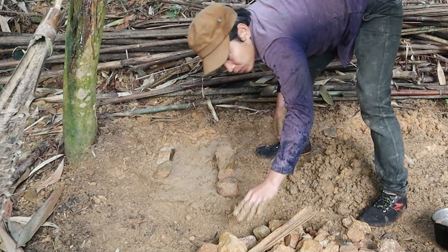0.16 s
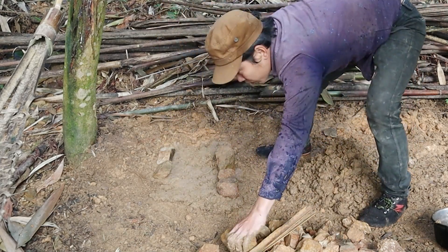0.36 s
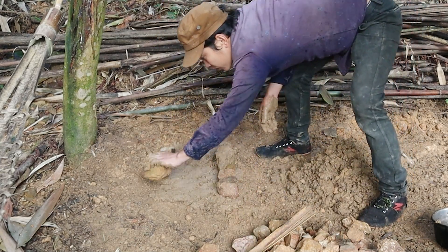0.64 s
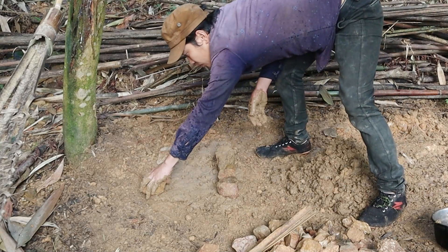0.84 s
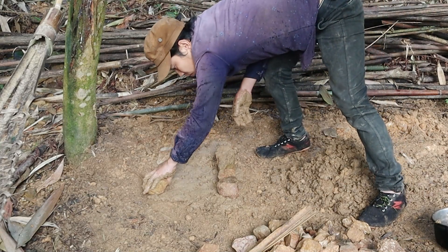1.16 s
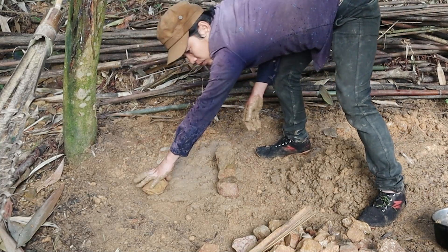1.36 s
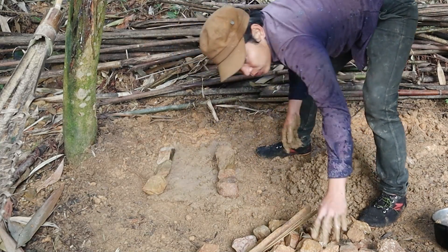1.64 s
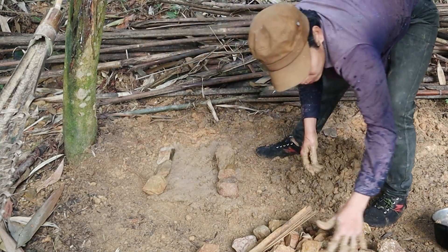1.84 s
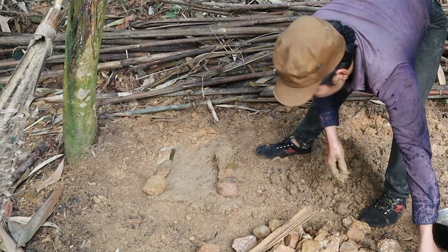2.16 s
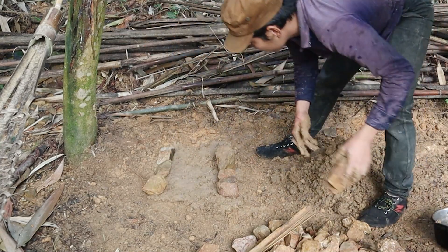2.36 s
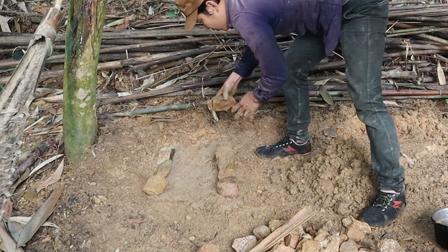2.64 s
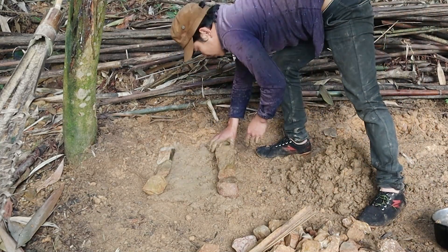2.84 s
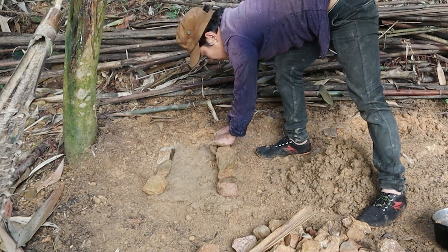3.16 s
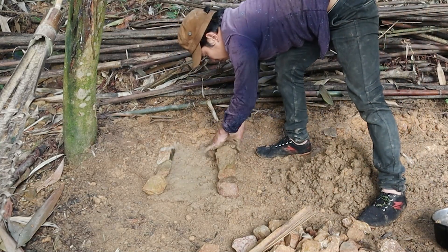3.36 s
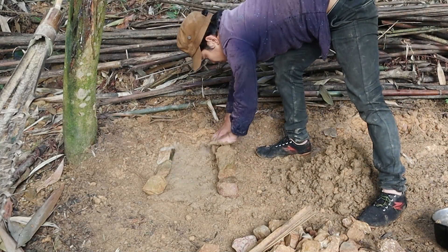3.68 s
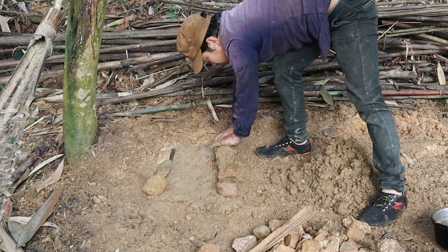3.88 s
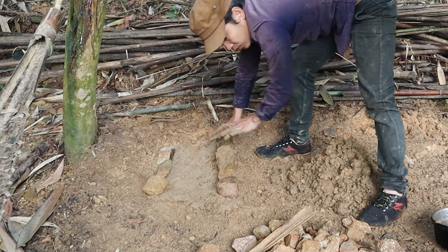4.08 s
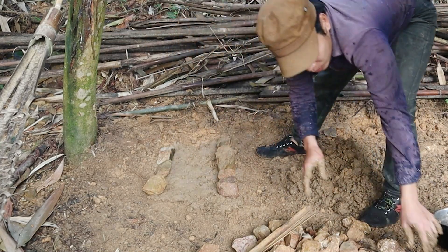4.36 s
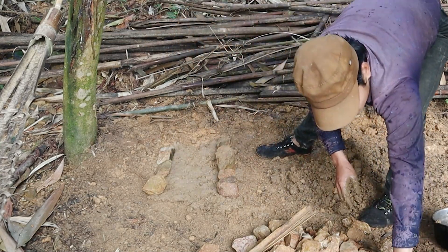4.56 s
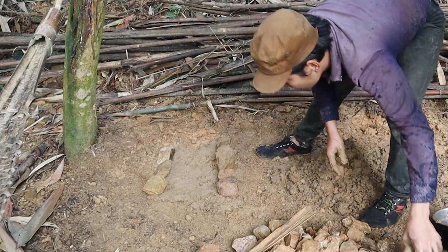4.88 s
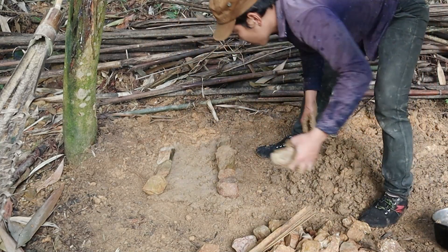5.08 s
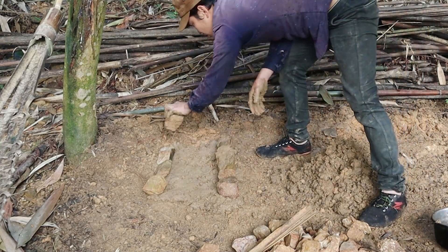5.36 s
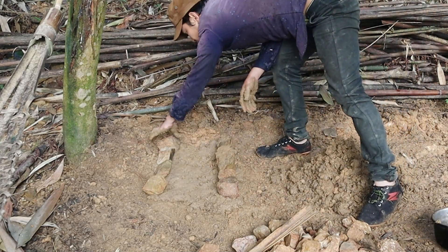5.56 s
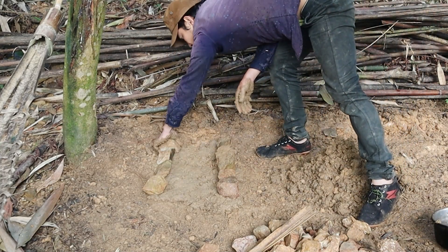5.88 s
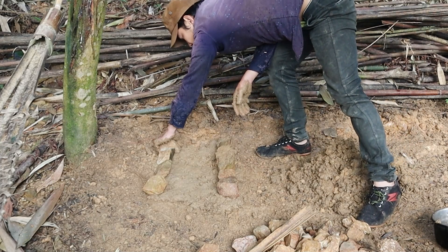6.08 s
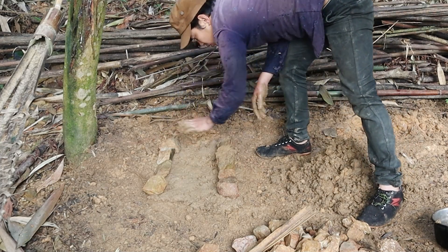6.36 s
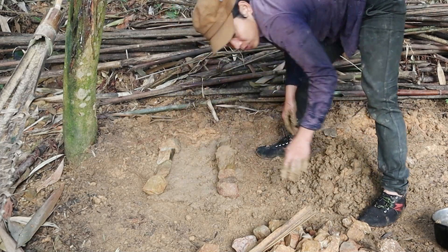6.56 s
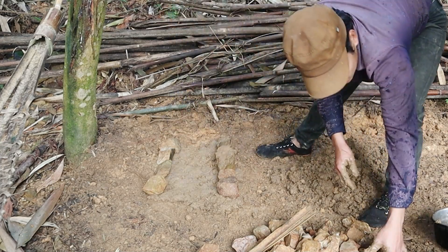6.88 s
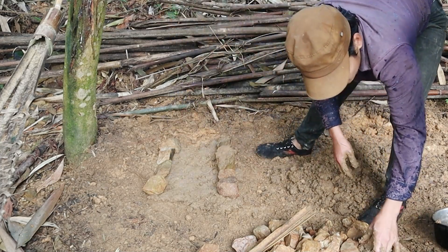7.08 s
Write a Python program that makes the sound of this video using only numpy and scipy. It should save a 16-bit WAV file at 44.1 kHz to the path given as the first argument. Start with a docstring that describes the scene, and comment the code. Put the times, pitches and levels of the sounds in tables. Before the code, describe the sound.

At the edge of a wood, someone sets stones into dry soil close to the microphone. One lands with a sharp, gritty clack, three more follow near the middle, and two land later with dull thuds. In between, stones tap together and hands briefly scrape loose earth. High insects drone throughout over a soft hush, with a few faint bird chirps and a thin distant hum.

```python
"""At the edge of a wood, someone picks stones from a heap and beds them in dry soil, close to one microphone.
Each stone clacks, crushes grit and thumps the ground, then rocks once. In between, stones tap together
and hands scrape through loose earth; the woodpile and trees scatter these sounds into a short tail.
Insects drone high in the trees, with a few faint bird chirps and a thin hum farther off."""
import sys
import numpy as np
from scipy import signal
from scipy.fft import rfft, irfft, next_fast_len
from scipy.io import wavfile

SR = 44100
rng = np.random.default_rng(int(sys.argv[2]) if len(sys.argv) > 2 else 0)


def generate_wav(sig):
    """Save sig (samples, or channels by samples) to the path in sys.argv[1] as 16-bit PCM at SR."""
    pcm = np.round(np.clip(np.atleast_2d(sig).T, -1, 1) * 32767).astype(np.int16)
    wavfile.write(sys.argv[1], SR, pcm)


N = 318402

# Stones set down by the microphone. Each row: time in seconds, clack peak in dB, pitch in Hz, overtone
# peak in dB, its pitch in Hz, seconds until the grit gives way, grit level in dB, thud level in dB,
# rocking in dB relative to the landing.
PLACINGS = [(0.7545, -1, 1145, -11.5, 3430, 0.00089, -13.5, -15, -10.5),
            (2.9074, -3.5, 1400, -15, 4020, .0005, -5.5, -22, -24),
            (3.3358, -8.5, 1000, -12.5, 2780, .001, -26, -33, -19),
            (3.7123, -6.5, 866, -10.5, 1640, .016, -17, -21.5, -7.5),
            (5.5193, -14, 1170, -7, 2380, .0003, -3.5, -2.5, -35),
            (5.9344, -22.5, 655, -11, 5400, .0003, -19, -17.5, -14.5)]
# The spectrum of breaking grit. Each row: frequency in Hz, relative level in dB.
GRIT = [(40, -39), (150, -9), (400, 0), (1000, 0), (1600, -1.5), (3500, 1), (6000, 1.5), (9000, 1),
        (11000, -8.5), (15000, 9.5)]
ROCK_S = .0095  # from landing to rocking
LEAD_S = .01  # room before each blow for its first tiny contacts


def from_db(db):
    """Decibels to gain."""
    return 10 ** (np.asarray(db) / 20)


def rms_one(x):
    """Scale to unit power."""
    return x / np.sqrt(np.mean(x ** 2) + 1e-20)


def add(out, s, sound):
    """Mix a sound in, starting at s seconds."""
    start = round(s * SR)
    first, last = max(start, 0), min(start + len(sound), N)
    if last > first:
        out[first:last] += sound[first - start:last - start]


def coloured(x, spectrum, shape=lambda hz: 1):
    """Filter x by a spectrum, times an extra gain by frequency; rms 1."""
    size = next_fast_len(len(x))
    hz = np.maximum(np.arange(size // 2 + 1) * SR / size, 1)
    points_hz, points_db = np.transpose(spectrum)
    gain = from_db(np.interp(np.log(hz), np.log(points_hz), points_db)) * shape(hz)
    return rms_one(irfft(rfft(x, size) * gain, size)[:len(x)])


def drift(per_s):
    """Glide between random values, per_s of them a second; rms 1."""
    position = np.arange(N) / SR * per_s
    return rms_one(np.interp(position, np.arange(N), rng.standard_normal(N)))


def grains(size, per_s, spread_db):
    """Crumbs snapping at random, as clicks of uneven strength."""
    snaps = rng.random(size) < per_s / SR
    return snaps * rng.choice([-1, 1], size) * from_db(spread_db * np.minimum(rng.exponential(1, size), 4))


def damped_ring(hz, q):
    """A struck body's ring, which swells and dies within a few cycles; peak 1."""
    w = 2 * np.pi * min(hz, SR / 2 - 2000) / SR
    damping = np.sin(w) / (2 * max(q, .3))
    b, a = [damping, 0, -damping], [1 + damping, -2 * np.cos(w), 1 - damping]
    ring = signal.lfilter(b, a, signal.lfilter(b, a, signal.unit_impulse(SR // 10)))
    return ring / np.abs(ring).max()


def insects(chorus_db=-39, singers_db=-43, throb=0.87, waver_hz=13, swell_db=2.0):
    """Up in the trees, a blurred far chorus and a few near singers that throb with each wing stroke."""
    # The far chorus. Each row: frequency in Hz, relative level in dB.
    chorus_spectrum = [(9000, -37), (10300, -21.5), (10750, -6), (11150, -1.5), (11900, -0.5),
                       (12080, -0.5), (12620, -0.5), (12780, -36), (13300, -44)]
    # The nearest insects. Each row: pitch in Hz, dB relative to singers_db, wing strokes a second.
    singers = [(11180, -9, 37), (12340, -6.5, 32), (12250, -2, 46), (12240, -2, 100)]
    t = np.arange(N) / SR
    resting = np.clip(np.minimum(t - .78, 1.32 - t) / .05, 0, 1)
    near_db = singers_db - 9 * resting  # the near singers ease off once
    chorus_gain = from_db(chorus_db + 0.3 * resting + 0.63 * drift(9))
    out = chorus_gain * coloured(rng.standard_normal(N), chorus_spectrum)
    for hz, db, strokes in singers:
        wing = np.sin(2 * np.pi * np.cumsum(strokes + 0.49 * drift(4.8)) / SR)
        tone = np.sin(2 * np.pi * np.cumsum(hz + waver_hz * drift(70)) / SR)
        out += from_db(near_db + db + swell_db * drift(16)) * rms_one(tone * (1 + throb * wing))
    return out


def far_hum(blur_hz=22):
    """One thin, wavering tone a long way off."""
    # The hum's course. Each row: time in seconds, pitch in Hz, rms level in dB.
    course = [(0, 920, -64), (1.2, 910, -67.5), (2.2, 865, -65.5), (3.5, 885, -70), (4.6, 870, -62),
              (5.4, 845, -66.5), (7.2, 850, -64)]
    s, hz, db = np.transpose(course)
    t = np.arange(N) / SR
    pitch_hz = np.interp(t, s, hz) + blur_hz * drift(90)
    tone = np.sin(2 * np.pi * np.cumsum(pitch_hz) / SR)
    return from_db(np.interp(t, s, db)) * rms_one(tone)


def woods_hush(db=-47):
    """The steady, soft noise of the wood all around."""
    # The hush. Each row: frequency in Hz, relative level in dB.
    spectrum = [(25, -10), (50, -20), (80, -2), (120, -1.5), (280, 0), (500, -2), (1300, -5), (3000, -6.5),
                (5700, -9), (6400, -12), (9500, -12), (13300, -5), (16000, -5.5)]
    return from_db(db) * coloured(rng.standard_normal(N), spectrum)


def birds(note_hz=2930, half_length_s=0.013, blur_hz=170, faint_db=-58.5, spread_octaves=0.33):
    """A far bird repeats one short note, blurred by the trees; fainter birds chirp at random."""
    # The repeated note. Each row: time in seconds, peak level in dB.
    notes = [(0.244, -44.5), (0.615, -51), (2.49, -52), (2.835, -53), (3.365, -37.5)]
    out, t = np.zeros(N), np.arange(N) / SR
    blur_cycles = np.cumsum(blur_hz * drift(500)) / SR
    chirps = [(s, db, note_hz) for s, db in notes]
    for when, pitch in rng.random(size=(10, 2)):
        chirps.append((when * t[-1], faint_db, note_hz * 2 ** (spread_octaves * (2 * pitch - 1))))
    for s, db, hz in chirps:
        span = np.abs(t - s) < 10 * half_length_s
        envelope = from_db(db) / (1 + ((t[span] - s) / half_length_s) ** 4)
        out[span] += envelope * np.sin(2 * np.pi * (hz * t[span] + blur_cycles[span]))
    return out


def clack(db, hz, q, rough_db, rough_s):
    """Rough faces meet LEAD_S in: one ring amid a spray of tiny contacts, weaker when it rings clean."""
    lead = round(LEAD_S * SR)
    t = np.arange(-lead, lead) / SR
    ring = from_db(db) * damped_ring(hz, q)
    contacts = grains(len(t), per_s=7600, spread_db=-0.5) * np.exp(-np.abs(t - rough_s) / rough_s)
    spray = coloured(contacts, GRIT, lambda f: 1 / (1 + (hz / f) ** 2) / np.sqrt(1 + (f / (3 * hz)) ** 2))
    spray_gain = from_db(rough_db) * np.linalg.norm(ring) / np.sqrt(len(t) * q) * hz / (hz + 1800)
    sound = np.pad(ring, (lead, 0))
    sound[:len(t)] += spray_gain * spray
    return sound


def taps(rough_db=-3, rough_s=0.00096, rebound_s=.0036, rebound_db=-3.5):
    """Stone taps stone in the hand or on the heap, and rebounds into a softer second touch."""
    # The taps. Each row: time in seconds, ring peak in dB, pitch in Hz, sharpness as Q.
    touches = [(0.3503, -28, 4500, .6), (0.368, -27.5, 1340, 2), (0.475, -26.5, 2360, 1.8),
               (0.501, -31, 1590, 0.91), (0.7817, -15, 1510, 0.26), (0.799, -15, 8000, 0.65),
               (0.981, -20.5, 9000, 0.31), (1.8967, -27.5, 2800, 1.7), (2.2083, -12, 8100, 1.4),
               (2.902, -9, 3280, 1.1), (3.1745, -21, 5800, 3.2), (3.1905, -11.5, 6150, 2),
               (3.318, -22, 5960, 1.2), (4.6857, -6, 8830, 6.1), (4.697, -5, 13600, 1.6),
               (4.7652, -9.5, 2760, 0.33), (4.836, -22, 4970, 0.34), (4.9092, -23.5, 4700, 3.1),
               (5.7715, -27.5, 5200, 4), (5.931, -12, 5300, 2), (7.0304, -14, 2000, 1.6),
               (7.063, -12.5, 2480, 1.2), (7.0765, -12.5, 2180, 0.58)]
    out = np.zeros(N)
    gaps = rebound_s * (1 + .15 * rng.uniform(-1, 1, len(touches)))
    for (s, db, hz, q), gap in zip(touches, gaps):
        add(out, s - LEAD_S, clack(db, hz, q, rough_db, rough_s))
        add(out, s + gap - LEAD_S, clack(db + rebound_db, hz, q, rough_db, rough_s))
    return out


def scrapes(bass_leak=0.099, fade_over_rise=1.58):
    """Soil and stones slide under the hand; fine dust sounds thinner than coarse crumbs."""
    # Hand strokes. Each row: time of the peak in seconds, rms level there in dB, rise in seconds,
    # frequency in Hz below which it thins, tilt in dB per octave.
    strokes = [(0.366, -37, 0.014, 860, 0.5), (0.799, -32.5, 0.0094, 500, 3.5),
               (1.06, -44.5, 0.029, 1500, 2.5), (1.24, -49.5, 0.015, 2500, 1),
               (1.86, -48.5, 0.039, 494, -1), (2.076, -42, .009, 12000, -1),
               (2.222, -28, 0.018, 4600, -0.2), (2.611, -38, .007, 12000, 0), (3.196, -43, 0.025, 4900, -2),
               (3.53, -41.5, 0.013, 4970, -1), (3.925, -38, 0.0076, 3000, 1),
               (4.693, -24.5, 0.013, 2130, -0.8), (4.772, -29.5, 0.0098, 970, 0.7),
               (4.832, -41, 0.022, 3000, 3.5), (5.3, -51, 0.034, 6000, 5), (5.79, -48, .02, 6000, 9),
               (5.952, -40, 0.013, 5000, -6), (6.1, -41, 0.0066, 800, -1), (7.058, -34.5, 0.03, 493, -0.6),
               (7.135, -30.5, .011, 600, 0.1)]
    # Loose dry soil. Each row: frequency in Hz, relative level in dB.
    soil_spectrum = [(60, -42), (250, 6.5), (1000, 8.5), (3000, 3.5), (6500, 1.5), (8800, 0.5),
                     (10500, 0.5), (14000, 7.5), (16000, -7)]
    out, t = np.zeros(N), np.arange(-SR // 4, SR // 4) / SR
    for s, db, rise_s, thin_hz, tilt_db in strokes:
        width_s = np.where(t < 0, rise_s, rise_s * fade_over_rise)
        pressure = np.exp(-np.abs(t / width_s) ** 1.52 / 2)
        fineness = lambda hz: (bass_leak + 1 / (1 + (thin_hz / hz) ** 6)) * from_db(tilt_db * np.log2(hz))
        soil = coloured(grains(len(t), per_s=5000, spread_db=5.5), soil_spectrum, fineness)
        add(out, s + t[0], from_db(db) * pressure * soil)
    return out


def knocks(stone_q=1.61, overtone_q=5, rough_db=-1, rough_s=0.001):
    """A stone lands with a clack; the ground answers with a dull thud, and again as the stone rocks."""
    # The earth's resonances. Each row: pitch in Hz, dB relative to the thud level, Q, lag in seconds.
    ground_modes = [(322, -5, 1.96, 0.0012), (152, -16, 2, 0.0023), (83, -30.5, 1.1, .005)]
    out = np.zeros(N)
    for s, db, hz, overtone_db, overtone_hz, _, _, thud_db, rock_db in PLACINGS:
        add(out, s - LEAD_S, clack(db, hz, stone_q, rough_db, rough_s))
        add(out, s - LEAD_S, clack(overtone_db, overtone_hz, overtone_q, rough_db, rough_s))
        for ground_hz, mode_db, q, lag_s in ground_modes:
            thud = from_db(thud_db + mode_db) * damped_ring(ground_hz, q)
            add(out, s + lag_s, thud)
            add(out, s + lag_s + ROCK_S, from_db(rock_db) * thud)
    return out


def crunches():
    """Grit breaks in a dense burst as the load comes on, and more softly as the stone rocks."""
    out, t = np.zeros(N), np.arange(-SR // 20, SR // 20) / SR
    for s, *_, gives_s, grit_db, _, rock_db in PLACINGS:
        landing = (gives_s, grit_db, 0.0018, 5860)
        rocking = (ROCK_S, grit_db + rock_db, 0.0021, 7550)
        for delay_s, db, half_length_s, dull_hz in (landing, rocking):
            load = np.exp(-(t / half_length_s) ** 2 / 2)
            snaps = grains(len(t), per_s=12000, spread_db=1.0)
            grit = coloured(snaps, GRIT, lambda hz: 1 / (1 + (hz / dull_hz) ** 2))
            burst = rms_one(grit * load) * np.sqrt(np.mean(load ** 2))
            add(out, s + delay_s + t[0], from_db(db) * burst)
    return out


def tree_scatter(x, build_s=0.0038):
    """Countless sticks and trunks scatter each band into a noisy tail that lasts longest in the bass."""
    # Returns from the woodpile and trees. Each row: band centre in Hz, gain in dB, seconds to fall 60 dB.
    bands = [(80, -16, 0.41), (171, -13.5, 0.31), (348, -21.5, 0.19), (685, -19.5, 0.21),
             (1380, -17.5, 0.13), (2940, -15.5, 0.15), (5800, -15, 0.13), (8700, -12, 0.13),
             (14000, -26, .18)]
    out, centres = np.zeros(N), np.array(bands)[:, 0]
    edges_hz = [50, *np.sqrt(centres[1:] * centres[:-1]), 18000]
    build = np.exp(-1 / (build_s * SR))
    for (_, db, t60), low, high in zip(bands, edges_hz, edges_hz[1:]):
        band = signal.butter(2, [low, high], "band", fs=SR, output="sos")
        decay = from_db(-60 / (t60 * SR)) ** 2
        energy = signal.sosfilt(band, x + 1e-18) ** 2 + 1e-18
        lingering = signal.lfilter([1 - decay], [1, -decay], energy)
        envelope = np.sqrt(signal.lfilter([1 - build], [1, -build], lingering))
        out += from_db(db) * envelope * rms_one(signal.sosfilt(band, rng.standard_normal(N)))
    return out


def scene(background_width_db=-42, scatter_width_db=-22, mono_below_hz=400):
    """The work close by, the wood behind; only a trace of diffuse sound differs between the channels."""
    background = lambda: insects() + far_hum() + woods_hush() + birds()
    work = knocks() + taps() + crunches() + scrapes()
    mid = work + tree_scatter(work) + background()
    side = from_db(background_width_db) * background() + from_db(scatter_width_db) * tree_scatter(work)
    side = signal.sosfilt(signal.butter(1, mono_below_hz, "high", fs=SR, output="sos"), side)
    return np.array([mid + side, mid - side])


def record(dry, cutoff_hz=16000):
    """This close, the hardest knocks overload the input; the highest treble is cut."""
    clipped = np.clip(dry, -1, 1)
    return signal.sosfilt(signal.ellip(10, .1, 70, cutoff_hz, fs=SR, output="sos"), clipped)


dry = scene()
out = record(dry)
generate_wav(out)
```